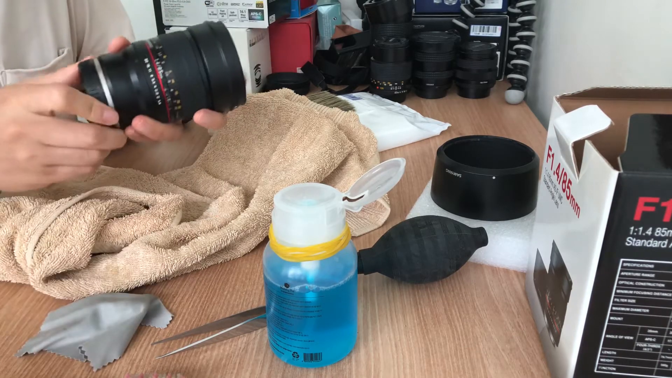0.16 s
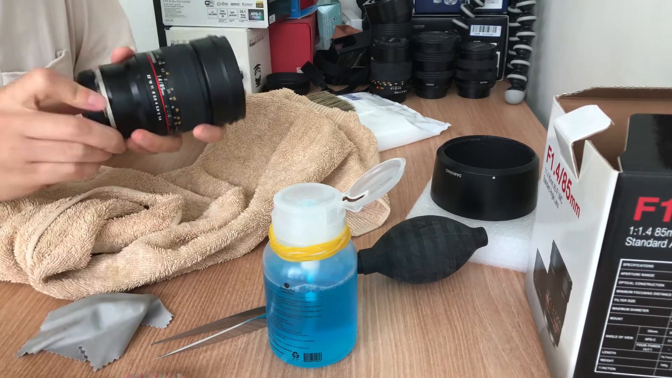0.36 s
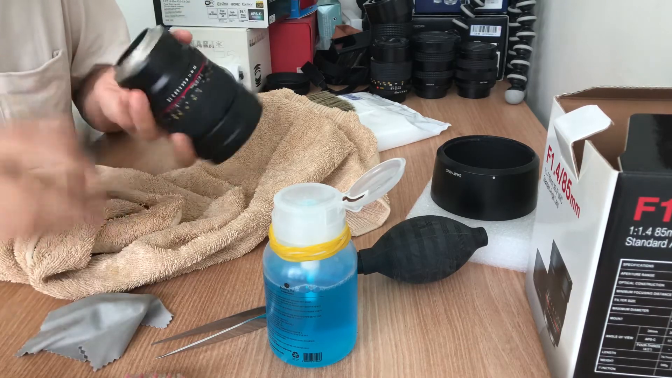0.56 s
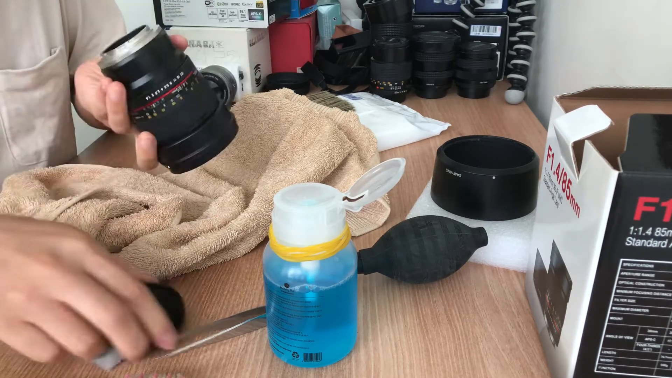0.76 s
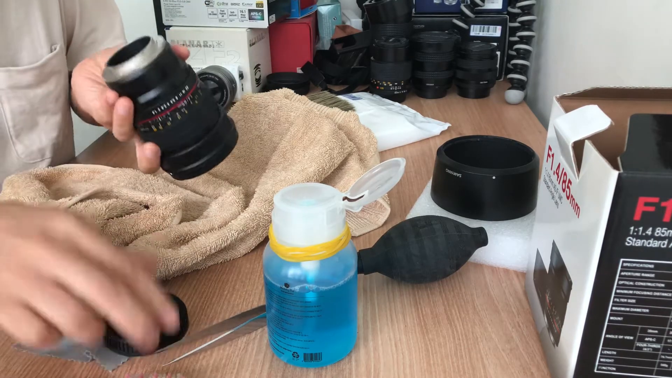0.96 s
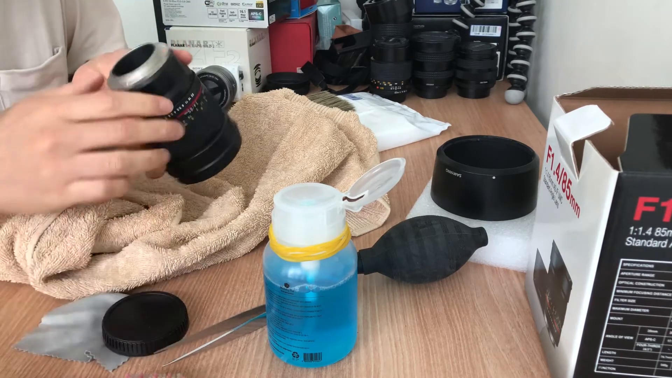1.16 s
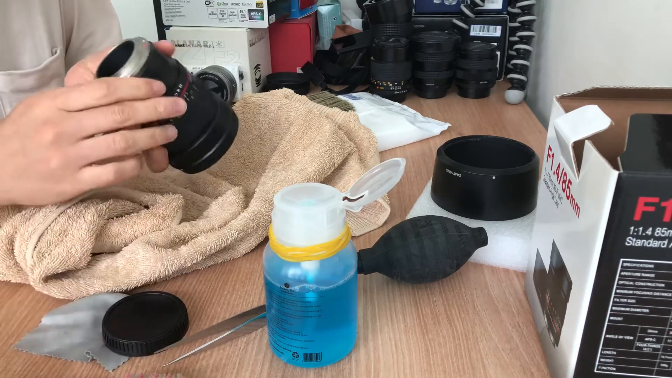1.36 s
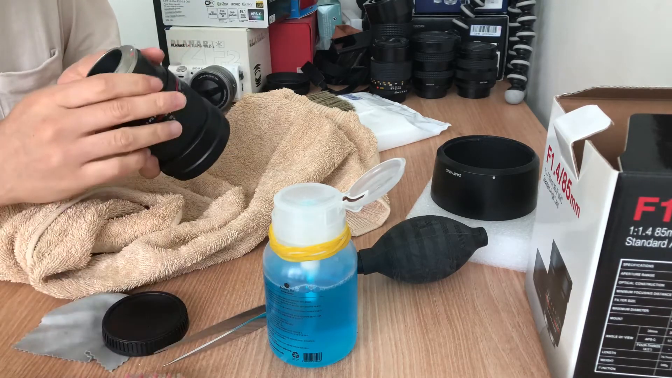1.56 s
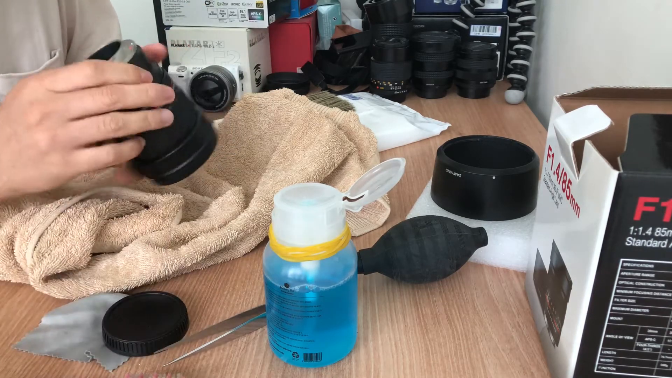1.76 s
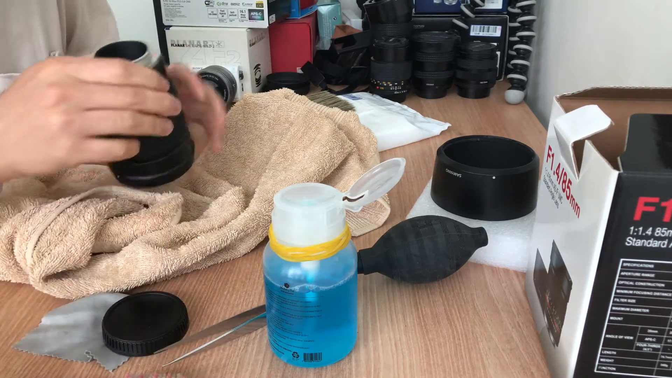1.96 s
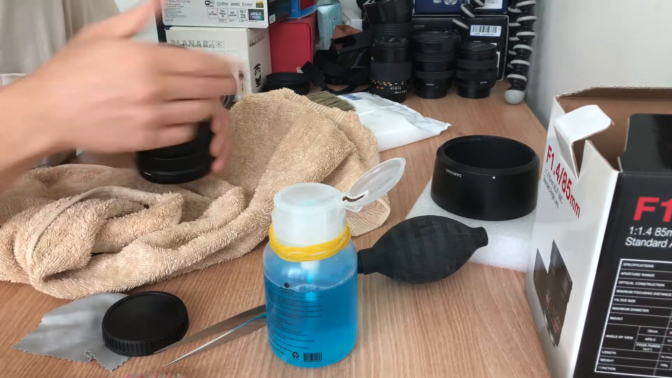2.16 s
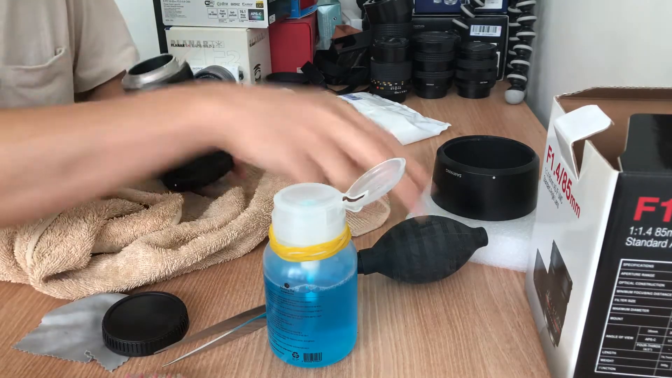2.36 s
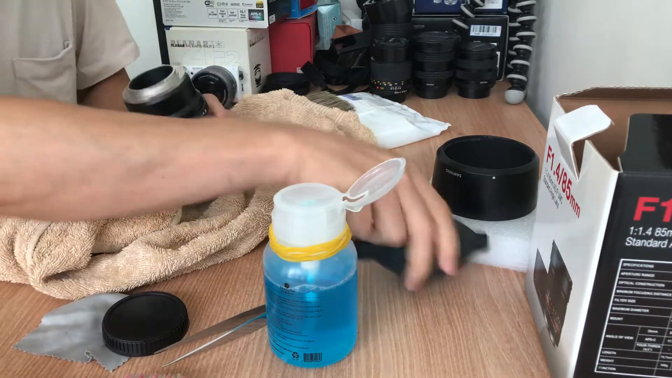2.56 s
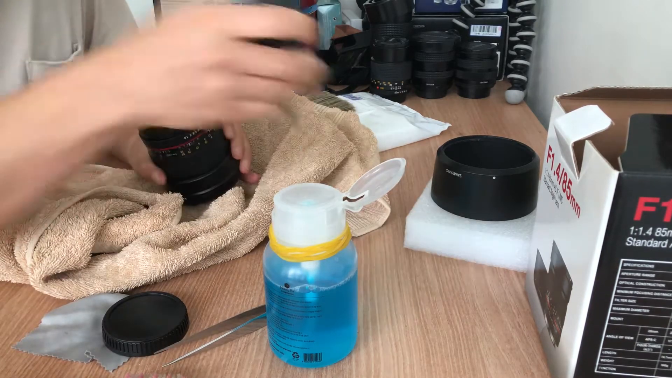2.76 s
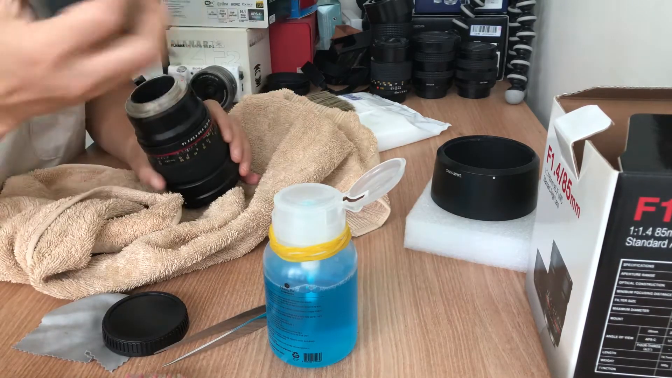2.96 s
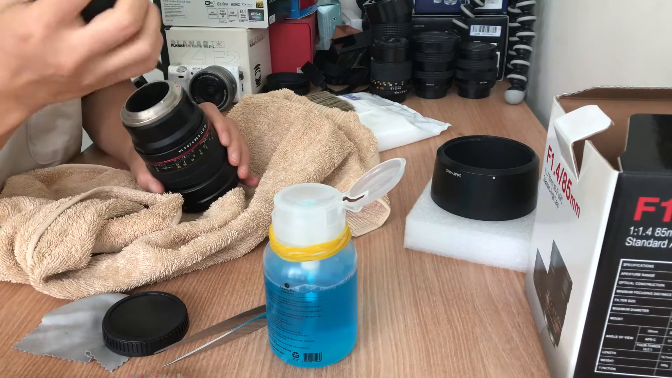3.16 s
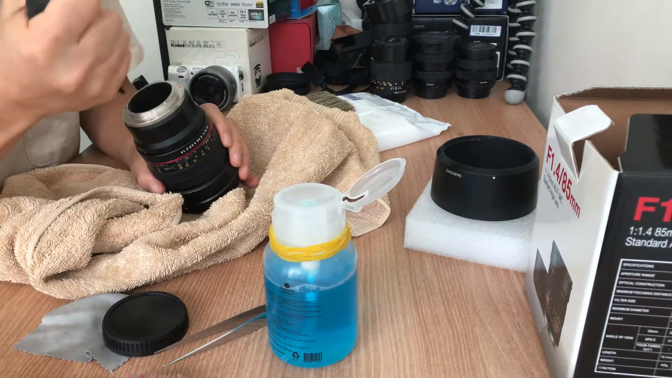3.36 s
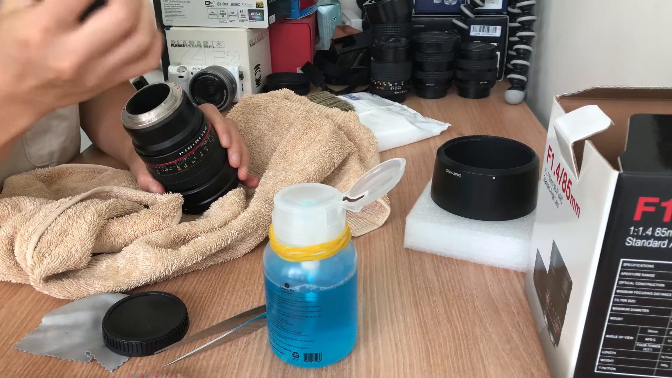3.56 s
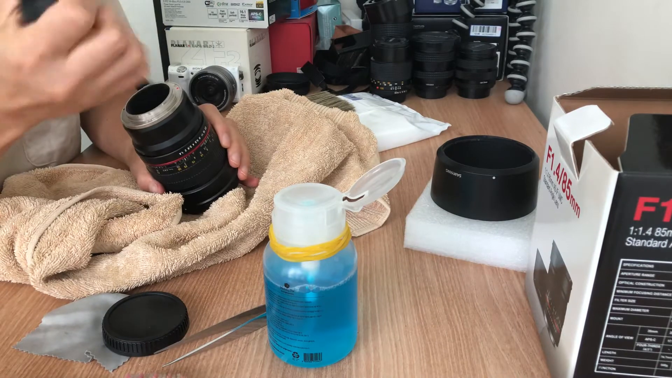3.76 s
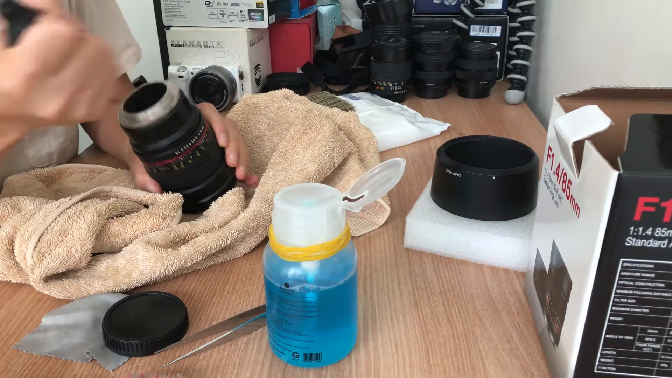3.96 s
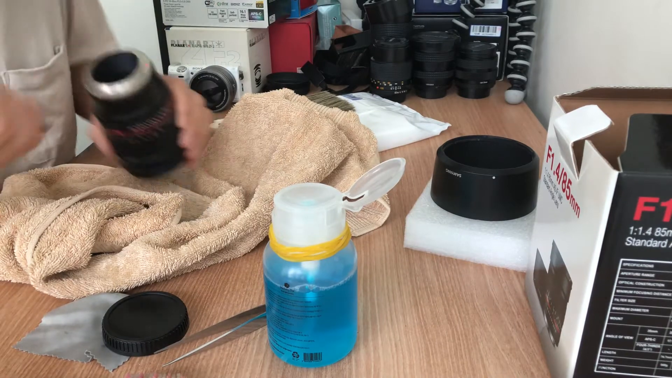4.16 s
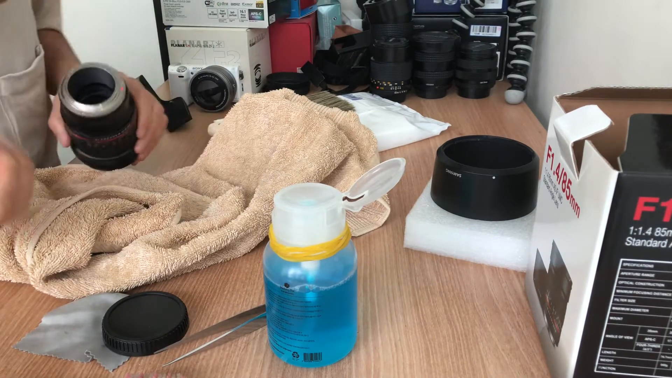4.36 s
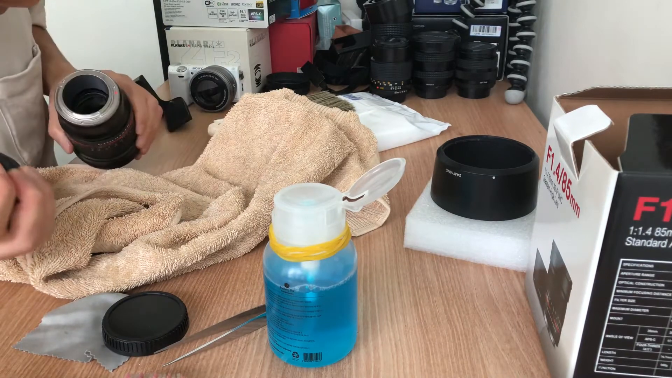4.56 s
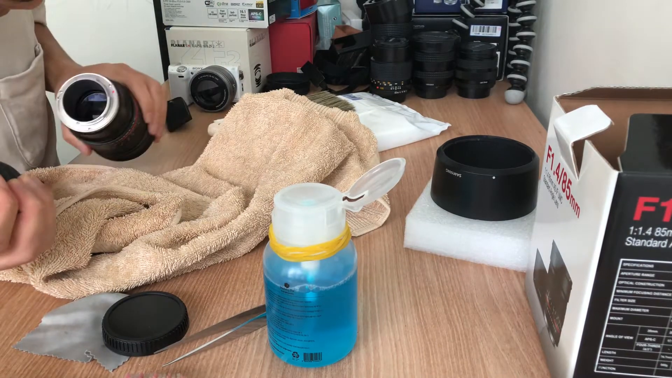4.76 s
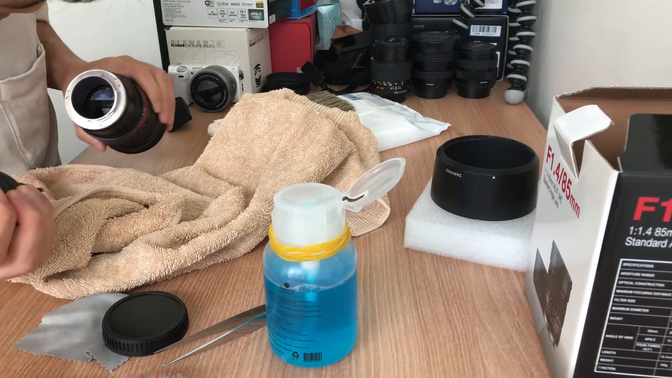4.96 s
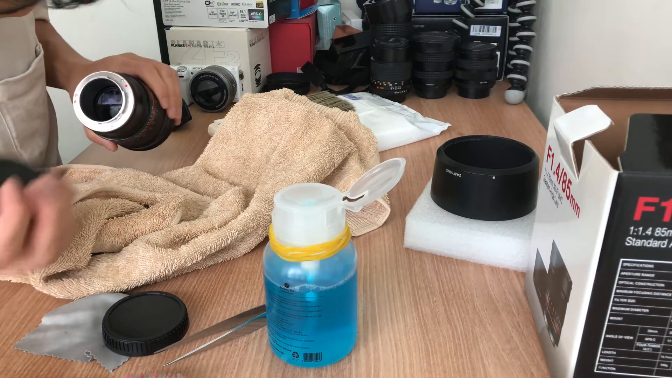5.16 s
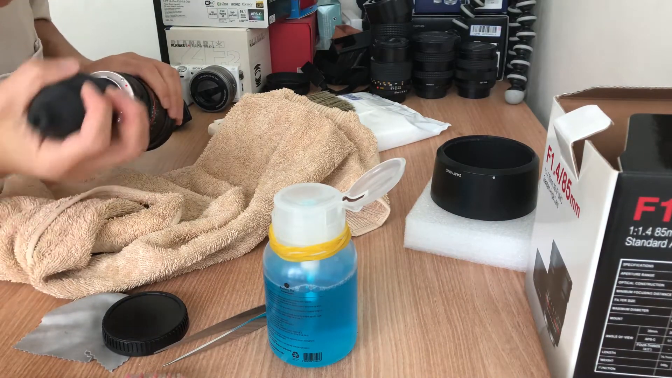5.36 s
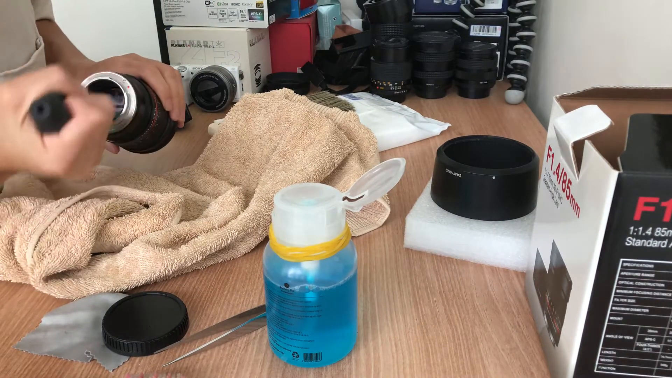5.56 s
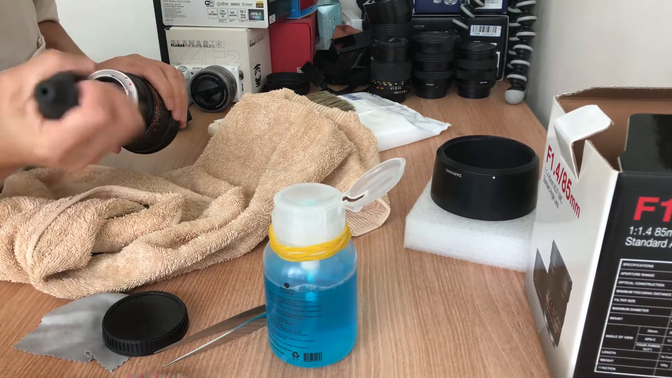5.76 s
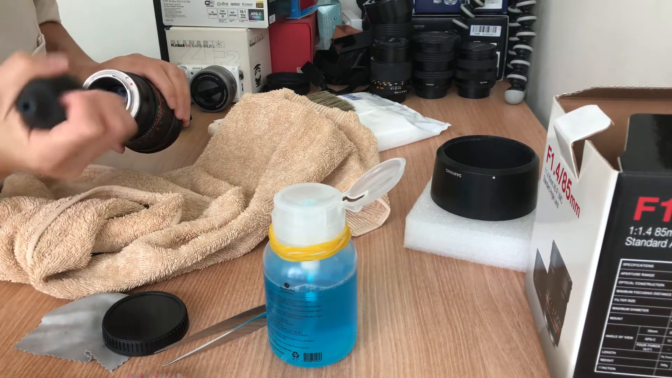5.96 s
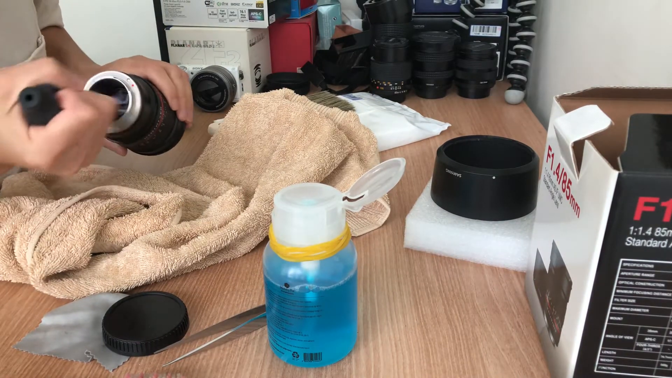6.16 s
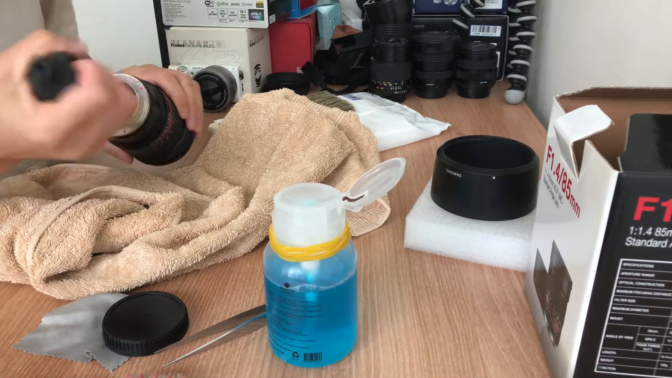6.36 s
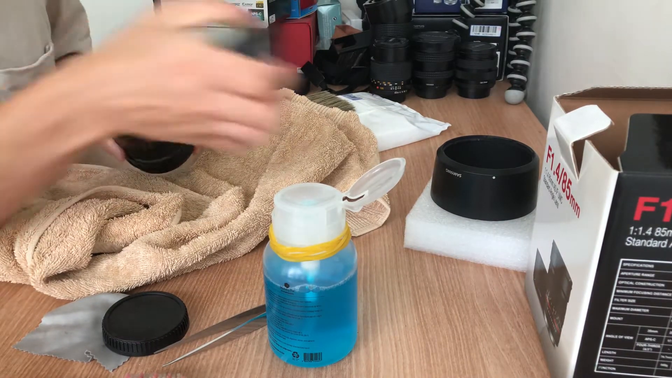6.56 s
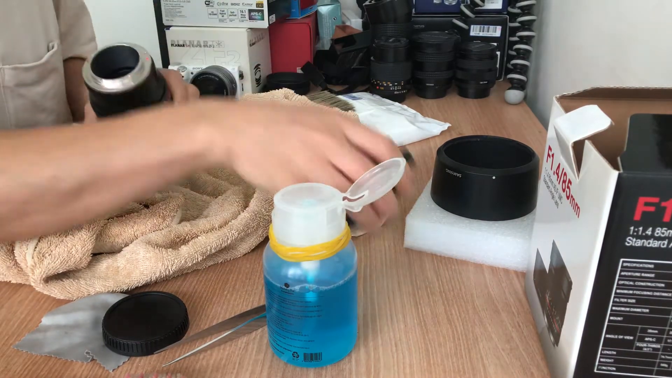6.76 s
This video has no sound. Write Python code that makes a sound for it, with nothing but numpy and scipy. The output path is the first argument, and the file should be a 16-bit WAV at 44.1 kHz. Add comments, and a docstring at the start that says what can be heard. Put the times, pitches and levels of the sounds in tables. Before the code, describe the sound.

A faint, low ventilation hum runs throughout in a small, hard-walled room, with all the action close by. In the first half second, a plastic cap twists off a camera lens with a soft scrape and a few light clicks. Around 0.8 to 1.1 seconds it lands on a desk, bouncing and rattling to rest while steel tweezers ring thinly. A small knock comes at 2.4 seconds, then brief finger rubs and a tap near 3 seconds. A rubber bulb blower gives three quick puffs at about 3.3, 3.6 and 3.9 seconds, much louder than the handling. Each is a bright hiss with a hollow rush inside the lens, followed by a softer, slightly whistling intake as the bulb refills. After a pause, four more puffs come at about 5.5, 5.8, 6.1 and 6.5 seconds, the last thinner and sputtering across the rim.

```python
"""A desk in a small, hard-walled room with a faint hum: a camera lens is cleaned.
Its plastic rear cap is twisted off and dropped; it ticks, chirps and rattles, and steel tweezers ring on.
Fingers tap and rub, then a rubber bulb blower gives seven puffs. Each hisses at the nozzle,
roars in the hollow lens mount, and is followed by the bulb sucking itself full."""
import sys
import numpy as np
from scipy import signal
from scipy.fft import rfft, irfft, next_fast_len
from scipy.io import wavfile
from scipy.ndimage import map_coordinates

SR = 44100
rng = np.random.default_rng(int(sys.argv[2]) if len(sys.argv) > 2 else 0)


def persist_wave(psi):
    """Save psi, clipped to +-1, as 16-bit WAV."""
    counts = np.round(np.clip(psi, -1, 1) * 32767).astype(np.int16)
    wavfile.write(sys.argv[1], SR, np.atleast_2d(counts).T)


N = 300762
TIME_S = np.arange(N) / SR

# bulb squeezes: start_s, length_s, hiss_db, hiss_swell_db, refill_s, delay_to_lens_s, on_lens_s,
# roar_db, roar_swell_db, tuning_ratio, aim
PUFFS = [(3.304, 0.12, -21.5, -5, 0.18, 0.019, 0.096, -17, 1.5, 0.98, "above"),
         (3.629, 0.097, -22.5, 1, 0.2, 0.013, 0.11, -18.5, -2, 0.97, "above"),
         (3.938, .131, -26, 9, 0.19, .011, 0.11, -19, 4.5, 0.98, "above"),
         (5.509, 0.098, -22.5, -9, 0.2, .014, .102, -18.5, -3, 0.93, "front"),
         (5.838, 0.1, -18.5, 16, .181, .024, 0.066, -16, 1, 0.974, "front"),
         (6.133, .11, -24, 29.5, 0.17, .014, 0.077, -17, 11.5, 0.94, "front"),
         (6.457, 0.093, -17, 2.5, 0.16, 0.018, 0.077, -45, 0, 1.44, "rim")]


def lens_mount():
    """Each puff roars in the lens once its jet arrives; a jet crossing the rim blurts briefly."""
    # rim crossings: start_s, length_s, roar_db
    crossings = [(6.429, 0.027, -30), (6.453, .022, -16.5), (6.519, .02, -26.5)]
    out = np.zeros(N)
    for start_s, *_, delay_s, on_lens_s, roar_db, swell_db, tuning, aim in PUFFS:
        add(out, start_s + delay_s, amp(roar_db) * jet_on_lens(on_lens_s, swell_db, tuning, aim))
    for start_s, length_s, roar_db in crossings:
        add(out, start_s, amp(roar_db) * jet_on_lens(length_s, swell_db=6.5, tuning=1, aim="rim"))
    return out


def jet_on_lens(length_s, swell_db, tuning, aim):
    """The jet flutters across the mount and sounds its hollows; the splash peaks with air speed."""
    # mount resonances by aim, before tuning: centre_hz, width_hz, gain_db
    mount_modes = {"above": [(867, 69, -8.5), (1080, 130, -7.5), (2010, 160, -12.5), (2520, 130, -6),
                   (3314, 203, -0.5), (3493, 170, 0.5), (3998, 360, -2.5), (4410, 290, -5.5),
                   (6290, 150, -17), (6610, 160, -15), (7800, 280, -14)], "front": [(1000, 350, -17),
                   (1804, 240, -11.5), (2460, 150, -13), (3200, 254, -3.5), (3577, 190, 3),
                   (3830, 230, -2.5), (4320, 310, -4), (5010, 220, -9.5), (6140, 110, -11.5),
                   (6560, 57, -9.5), (7370, 150, -12.5)], "rim": [(1005, 240, -9.5), (2626, 100, -4),
                   (3334, 146, 4), (4320, 93, -6.5), (6440, 95, -17)]}
    # spectrum of splashing air: freq_hz, density_db
    splash_spectrum = [(150, -37), (350, -11), (520, -17), (900, -9), (1400, -9), (2000, -6), (4500, -1),
                       (5500, -3.5), (8200, 0), (10000, -2), (12000, -12), (15500, -11.5)]
    # splash peak over roar, by aim: gain_db
    splash_over_roar_db = {"above": -0.5, "front": 0, "rim": -4}
    size = SR // 4
    t = np.arange(size) / SR
    cavity = lambda f: resonances(mount_modes[aim], f / tuning) * f ** 2 / (f ** 2 + 600 ** 2)
    roar = unit(filtered(rng.standard_normal(size), cavity))
    roar *= amp(swell_db * (np.minimum(t / length_s, 1) - 0.5) + 1.8 * wobble(170, size))
    slack_db = 18 * np.minimum(np.abs(t / length_s - 0.72), 1)  # fastest air at 72 % of the length
    splash = near_echoes(noise(splash_spectrum, size), strength=0.27)
    splash *= amp(splash_over_roar_db[aim] - slack_db + 2.2 * wobble(123, size))
    return (roar + splash) * gate(t, length_s, rise_s=0.0025, fall_s=0.008)


def nozzle():
    """The jet spurts as the valve shuts, then hisses while the hand presses."""
    # jet spectrum: freq_hz, density_db
    jet_spectrum = [(300, -37.5), (1500, -21.5), (3500, -11), (6000, -8), (9000, -5), (12000, -4),
                    (14000, 0), (15600, -1)]
    out, size = np.zeros(N), SR // 4
    t = np.arange(size) / SR
    spurt = amp(-21) * bump(t, middle_s=0.012, length_s=0.0088)
    for start_s, length_s, hiss_db, swell_db, *_ in PUFFS:
        press = amp(hiss_db + swell_db * (np.minimum(t / length_s, 1) - 0.5))
        press *= gate(t, length_s, rise_s=0.0074, fall_s=0.0071)
        jet = near_echoes(noise(jet_spectrum, size), strength=0.26) * amp(1.7 * wobble(99, size))
        add(out, start_s, np.hypot(press, spurt) * jet)
    return out


def refill():
    """The released bulb draws air ever faster until full; its valve adds a breathy, rising whistle."""
    # intake spectrum: freq_hz, density_db
    intake_spectrum = [(400, -27), (1200, -9), (4500, -10.5), (5800, -7), (7000, -2), (8100, -3.5),
                       (9000, -9), (11500, -10), (13000, -5), (14500, 3), (15700, 2)]
    final_db, climb_db = -34.5, 13.5
    out, size = np.zeros(N), SR // 2
    t = np.arange(size) / SR
    for start_s, length_s, _, _, refill_s, *_ in PUFFS:
        flow = np.clip(t / (refill_s - 0.03), 0, 1)
        hiss = near_echoes(noise(intake_spectrum, size), strength=0.53)
        pitch_hz = 7000 + 1100 * flow + 300 * wobble(33, size)
        breath = wobble(1000, size) * amp(3 * wobble(25, size))
        whistle = breath * np.sin(2 * np.pi * np.cumsum(pitch_hz) / SR)
        level = amp(final_db - climb_db * (1 - flow) + 2.8 * wobble(72, size))
        level *= gate(t, refill_s, rise_s=0.015, fall_s=0.0033)
        add(out, start_s + length_s, level * (hiss + 0.36 * whistle))
    return out


def cap():
    """The plastic cap clacks on the desk, bounces and rattles to rest."""
    # bounces: start_s, level_db, tilt_db_per_octave
    bounces = [(0.8438, -45, -1.4), (0.9284, -32.5, -3), (0.9598, -39.5, -0.5), (.97, -39, 1),
               (0.9809, -45.5, -1), (.9843, -41, -1), (1.0049, -41, -2), (1.0202, -41, -1.5)]
    # desk board and shell ringing together: centre_hz, width_hz, gain_db
    shell_modes = [(333, 47, 1.5), (675, 100, -4), (1010, 210, -3.5), (1220, 160, -4.5), (1750, 460, -2),
                   (2350, 70, 1), (2590, 72, -5), (3070, 120, -7), (4470, 120, -5), (6040, 58, -10),
                   (9090, 60, -26), (12360, 49, -22), (2400, 4.9, 6)]
    # spectrum of the bare contact: freq_hz, density_db
    clack_spectrum = [(150, -17), (350, -2.5), (520, -21), (1000, -3.5), (1750, -9.5), (2700, -6),
                      (3600, -6), (5000, -13.5), (7000, -19.5), (16000, -35)]
    out, size = np.zeros(N), SR // 4
    t = np.arange(size) / SR
    for start_s, level_db, tilt_db in bounces + rattle(after_s=bounces[-1][0]):
        clack = unit(noise(clack_spectrum, size) * amp(-60 * t / 0.016))
        # each spot on the rim weights the modes anew
        modes = [(hz, width_hz, db + rng.normal(0, 2.1)) for hz, width_hz, db in shell_modes]
        shell = unit(filtered(signal.unit_impulse(size), lambda f: resonances(modes, f)))
        # a small body radiates almost no bass
        colour = lambda f: amp(tilt_db * np.log2((f + 800) / 2500)) * f ** 3 / (f ** 3 + 300 ** 3)
        add(out, start_s, amp(level_db) * unit(filtered(0.86 * clack + shell, colour)))
    return out


def rattle(after_s, count=6, first_db=-47.5, loss_db=2.5, tilt_db_per_octave=2.5):
    """The settling cap's contacts weaken and come unevenly faster."""
    gaps_s = 0.0095 * 0.93 ** np.arange(count) * np.exp(0.16 * rng.standard_normal(count))
    starts_s = after_s + np.cumsum(gaps_s)
    return [(s, first_db - loss_db * k, tilt_db_per_octave) for k, s in enumerate(starts_s)]


def rim_and_tweezers():
    """The cap's rim ticks and chirps as it lands; steel tweezers ring on."""
    # modes of the cap's rim (the two shortest) and the tweezers: pitch_hz, level_db, t60_s
    ring_modes = [(2290, -35, .8), (4370, -24, .03), (4414, -45, .23), (5950, -32, 0.13),
                  (6940, -51.5, 1.8), (8040, -23.5, 0.0094), (9030, -44, .21), (10250, -41.5, 0.52),
                  (10720, -50, 0.3), (13700, -52, .25), (15095, -42, 0.32)]
    # cap contacts, each favouring other modes: start_s, gain_db, favoured_hz, width_octaves
    contacts = [(0.844, 4, 3440, 0.39), (0.962, -1, 12400, 0.44), (0.9698, 3.5, 8000, .12),
                (1.0205, 1, 5975, 0.17)]
    out, t = np.zeros(N), TIME_S[:SR]
    for start_s, gain_db, favoured_hz, octaves in contacts:
        for hz, level_db, t60_s in ring_modes:
            weight = np.exp(-(np.log2(hz / favoured_hz) / octaves) ** 2)
            ring = amp(gain_db + level_db - 60 * t / t60_s) * np.sin(2 * np.pi * hz * t)
            add(out, start_s, weight * ring)
    return out


def handling():
    """Fingers tap and slide on the lens and the bulb."""
    # finger knocks: start_s, level_db, centre_hz, width_octaves, t60_s
    touches = [(.314, -43, 1160, 1.15, 0.094), (.436, -41, 1400, 1.2, 0.039),
               (0.447, -41.5, 4000, 2.8, 0.029), (2.13, -52, 7000, 1.5, 0.033),
               (2.361, -32, 1130, 1, 0.056), (2.681, -49.5, 3500, 1.4, 0.014), (3.061, -34, 6300, 0.5, .07)]
    # lens barrel modes: centre_hz, width_hz, gain_db
    barrel_modes = [(990, 400, 1), (2324, 23, 14), (3000, 510, 3.5), (5990, 300, -1.5)]
    # skin sliding on plastic and rubber: middle_s, length_s, level_db
    rubs = [(0.319, 0.064, -59), (0.44, 0.039, -57), (0.674, 0.2, -69), (1.8, 0.25, -66), (2.2, 0.046, -64),
            (2.819, 0.044, -51), (2.968, 0.12, -53.5), (3.064, 0.035, -37.5)]
    # skin friction spectrum: freq_hz, density_db
    skin_spectrum = [(500, -7), (2000, -3), (4000, 0), (6000, 1), (8000, -2.5), (11000, -4), (15500, -4)]
    out, size = np.zeros(N), SR // 2
    t = np.arange(size) / SR
    for start_s, level_db, centre_hz, octaves, t60_s in touches:
        colour = lambda f: band(f, centre_hz, octaves) * (1 + np.abs(resonances(barrel_modes, f)))
        tap = unit(filtered(rng.standard_normal(size), colour))
        add(out, start_s, amp(level_db - 60 * t / t60_s) * tap)
    slide = sum(amp(db) * bump(TIME_S, middle_s, length_s) for middle_s, length_s, db in rubs)
    friction = unit(noise(skin_spectrum, N) * amp(5.3 * wobble(400, N)))
    return out + slide * friction


def twist():
    """The bayonet's lugs scrape as the cap turns."""
    # bayonet modes: centre_hz, width_hz, gain_db
    bayonet_modes = [(2420, 240, -2), (4350, 460, -12)]
    friction = rng.standard_normal(N) * amp(4 * wobble(203, N))
    scrape = unit(filtered(friction, lambda f: resonances(bayonet_modes, f)))
    return amp(-63.5) * bump(TIME_S, middle_s=0.25, length_s=0.25) * scrape


def whines():
    """Two thin, wavering tones swell out of the hum and fade."""
    # faint tones: middle_s, length_s, pitch_hz, level_db
    tones = [(2.1, 1.6, 3120, -73), (5.08, 0.38, 4020, -73)]
    return sum(amp(db) * bump(TIME_S, middle_s, length_s) * tone(hz, waver_rad=1, rate_hz=25)
               for middle_s, length_s, hz, db in tones)


def ventilation():
    """Low ventilation rumble with wavering hum lines."""
    # hum lines: pitch_hz, level_db
    lines = [(72, -58.5), (120, -54), (146, -58.5), (199, -59.5), (1060, -70.5), (1529, -75.5),
             (3117, -79.5)]
    # rumble spectrum: freq_hz, density_db
    rumble_spectrum = [(15, -62), (25, -21), (59, -10.5), (190, -3.5), (405, -15.5), (451, -24),
                       (624, -19.5), (887, -24), (1070, -22), (1330, -29), (1520, -25), (2280, -30.5),
                       (3160, -29.5), (5000, -41), (16000, -59.5)]
    hum = sum(amp(db + 1.5 * wobble(11, N)) * tone(hz, waver_rad=0.51, rate_hz=5.4) for hz, db in lines)
    return hum + amp(-48.5) * noise(rumble_spectrum, N)


def near_echoes(x, strength, reach_s=0.0022):
    """Weak echoes off hands, barrel and desk comb the spectrum anew for each pose; rms 1."""
    paths = rng.uniform(0.10025, 1, (5, 2))
    comb = lambda f: 1 + sum(strength * gain * np.exp(-2j * np.pi * f * lag * reach_s)
                             for gain, lag in paths)
    return unit(filtered(x, comb))


def room(x, wet_db, desk_db, desk_s=0.0042):
    """Adds the desk's echo and a diffuse tail whose treble dies sooner."""
    # room decay: freq_hz, t60_s
    decay = [(200, 0.41), (1400, 0.55), (3700, 0.36), (9000, 0.34), (15000, 0.23)]
    hz, t, spectra = signal.stft(rng.standard_normal(SR * 3 // 4), SR, nperseg=256)
    tail = signal.istft(spectra * amp(-60 * t / along(decay, hz)[:, None]), SR, nperseg=256)[1]
    tail *= 1 - np.exp(-TIME_S[:len(tail)] / 0.0065)
    response = amp(wet_db) * tail / np.linalg.norm(tail)
    add(response, desk_s, amp([desk_db]))
    return x + signal.fftconvolve(x, response)[:N]


def amp(db):
    """Decibels to gain."""
    return 10 ** (np.asarray(db) / 20)


def unit(x):
    """Scale to rms 1."""
    return x / np.sqrt(np.mean(x ** 2) + 1e-20)


def along(points, hz):
    """Read (freq_hz, value) points on a log axis."""
    f, values = np.transpose(points)
    return np.interp(np.log(hz + 1), np.log(f + 1), values)


def filtered(x, response):
    """Apply a frequency response."""
    size = next_fast_len(len(x) + 8192)
    return irfft(rfft(x, size) * response(np.fft.rfftfreq(size, 1 / SR)), size)[:len(x)]


def resonances(modes, f):
    """Causal response of resonators summed with alternating sign."""
    return sum((-1) ** k * amp(db) * 1j * f * width_hz / (hz * hz - f * f + 1j * f * width_hz)
               for k, (hz, width_hz, db) in enumerate(modes))


def band(f, centre_hz, octaves):
    """Band-pass gain with steep skirts."""
    return 1 / (1 + (np.log2((f + 1) / centre_hz) / octaves) ** 4)


def noise(spectrum, size):
    """Coloured noise, rms 1."""
    return unit(filtered(rng.standard_normal(size), lambda f: amp(along(spectrum, f))))


def tone(hz, waver_rad, rate_hz):
    """Sine with wandering phase, rms 1."""
    return np.sqrt(2) * np.sin(2 * np.pi * hz * TIME_S + waver_rad * wobble(rate_hz, N))


def wobble(rate_hz, size):
    """Smooth curve through random knots."""
    knots = rng.standard_normal(int(size * rate_hz / SR) + 4)
    return map_coordinates(knots, [np.arange(size) * rate_hz / SR])


def bump(t, middle_s, length_s):
    """Gaussian envelope."""
    return np.exp(-(2 * (t - middle_s) / length_s) ** 2)


def gate(t, length_s, rise_s, fall_s):
    """Soft-edged window from 0 to length_s."""
    return (1 + np.tanh(t / rise_s - 1)) * (1 - np.tanh((t - length_s) / fall_s)) / 4


def add(track, start_s, sound):
    """Mix a sound into the track."""
    part = track[round(start_s * SR):][:len(sound)]
    part += sound[:len(part)]


def scene():
    """Blower and handling in the room, over its hum; mono."""
    air = room(nozzle() + refill() + lens_mount(), wet_db=-9, desk_db=-23.5)
    contacts = room(cap() + handling() + twist(), wet_db=-5, desk_db=-8.5)
    ringing = room(rim_and_tweezers(), wet_db=-16, desk_db=-14)
    return (air + contacts + ringing + ventilation() + whines())[None]


def record(dry):
    """Soft peak limit, then a steep low-pass."""
    ceiling, cutoff_hz = 0.9, 15900
    limited = dry[0] / (1 + (dry[0] / ceiling) ** 8) ** (1 / 8)
    return filtered(limited, lambda f: (1 - np.tanh((f - cutoff_hz) / 70)) / 2)[None]


dry = scene()
out = record(dry)
persist_wave(out)
```